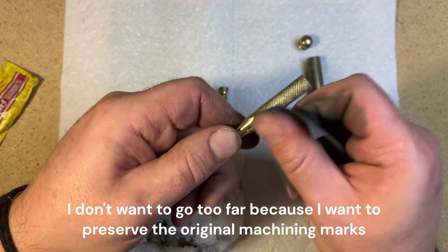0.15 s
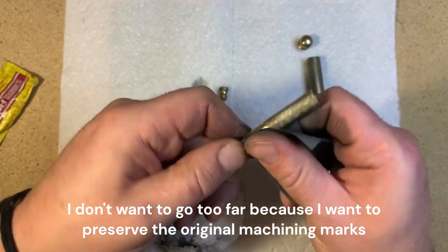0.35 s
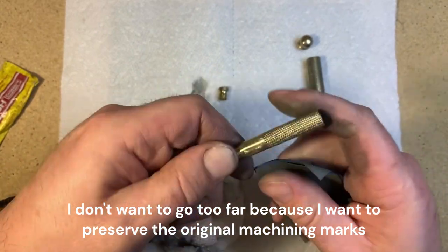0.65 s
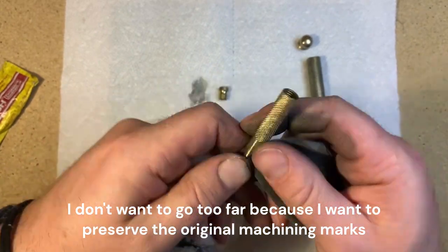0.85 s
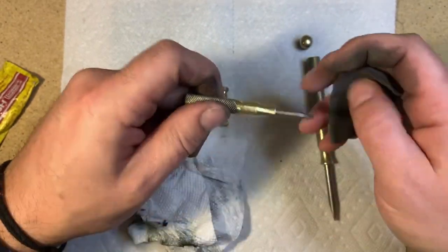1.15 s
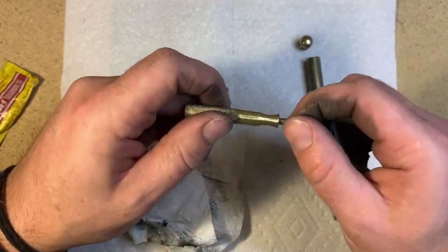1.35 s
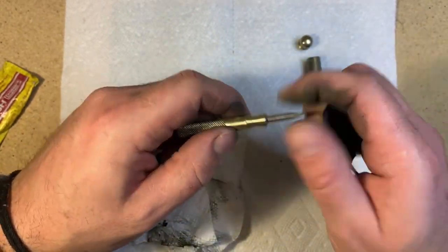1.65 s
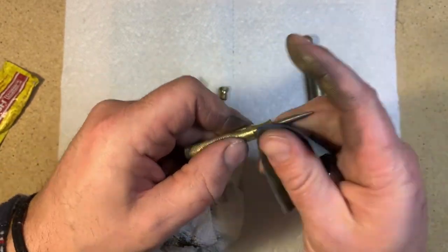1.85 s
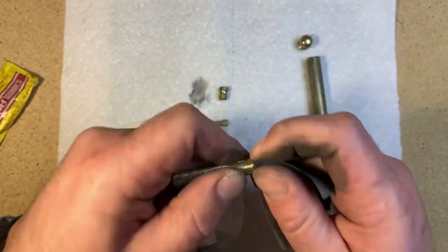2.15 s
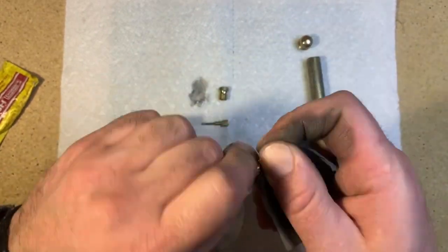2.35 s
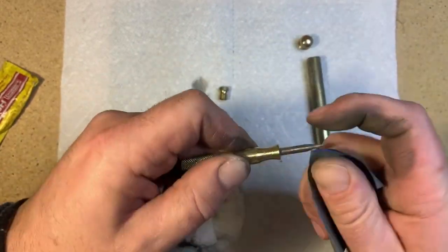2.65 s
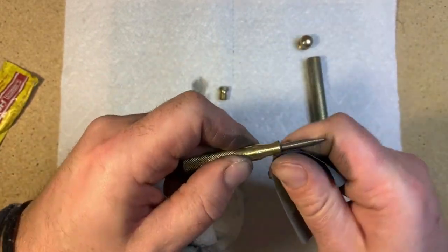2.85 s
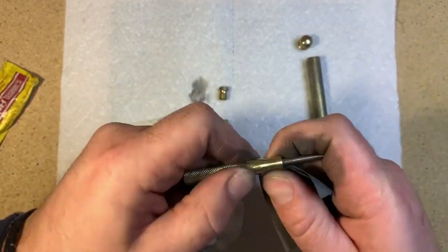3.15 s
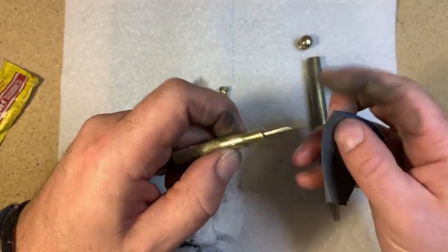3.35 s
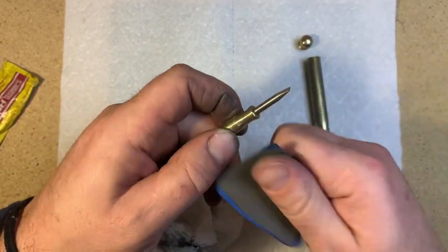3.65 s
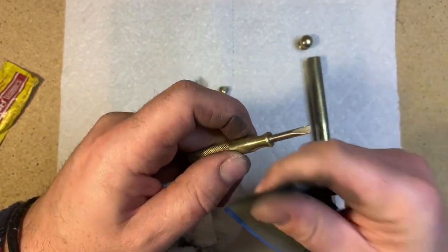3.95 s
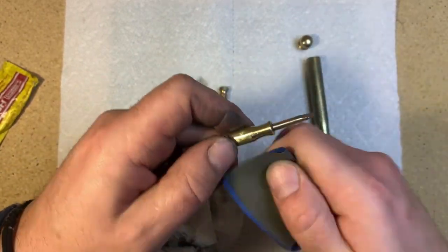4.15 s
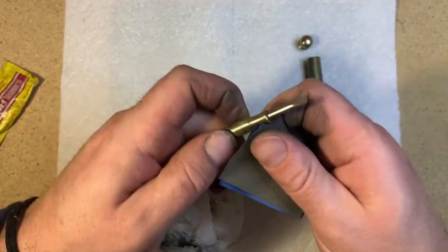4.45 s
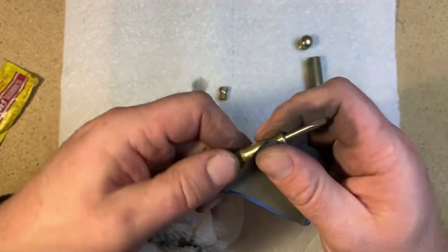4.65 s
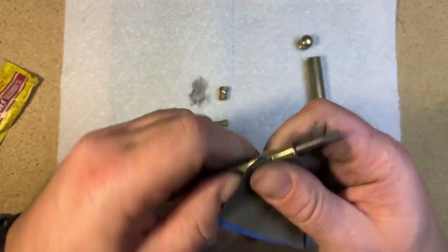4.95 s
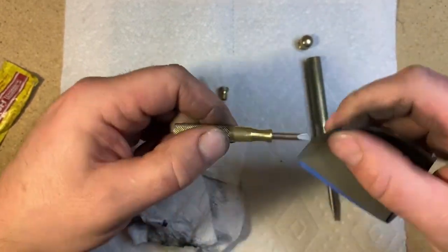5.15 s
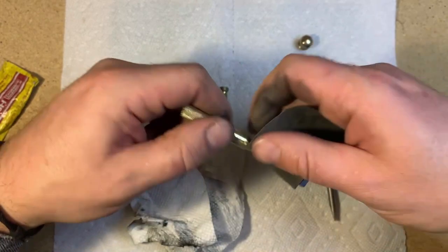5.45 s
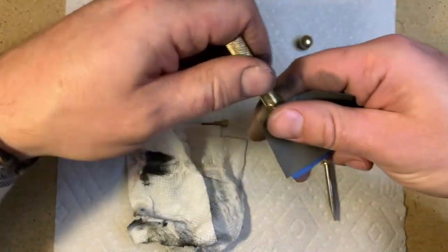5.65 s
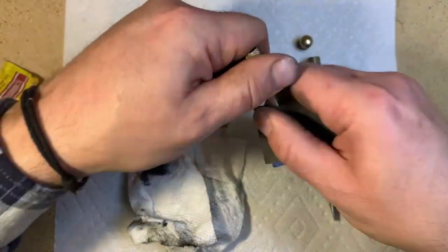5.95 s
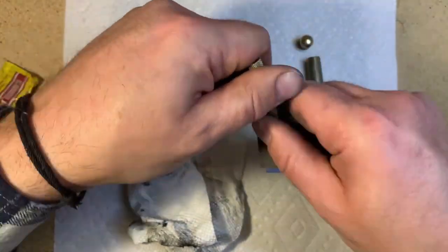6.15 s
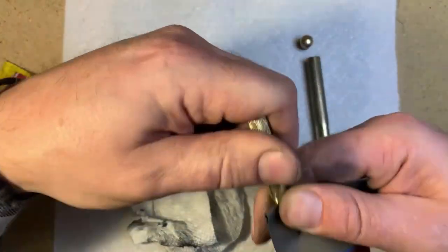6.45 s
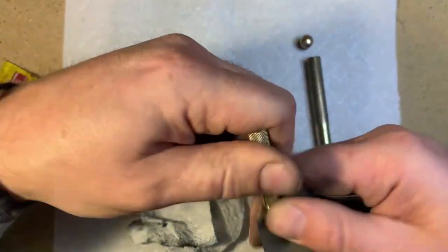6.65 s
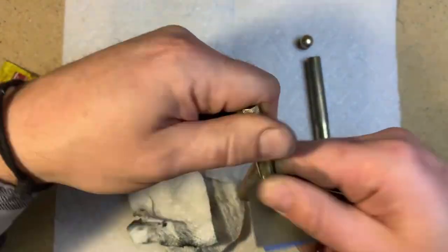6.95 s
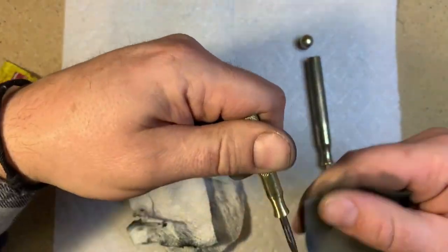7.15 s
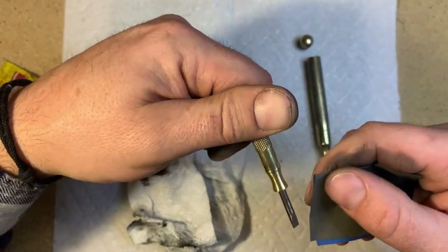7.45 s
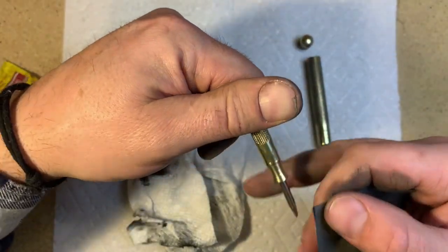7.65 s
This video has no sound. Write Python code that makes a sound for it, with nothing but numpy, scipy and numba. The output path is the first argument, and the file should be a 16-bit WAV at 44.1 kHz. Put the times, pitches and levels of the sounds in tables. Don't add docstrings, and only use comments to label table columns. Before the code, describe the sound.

Close, bright rasping of fine grit on metal in short uneven bouts, pausing once, while hands lightly knock and nudge the bench.

```python
import sys
import numpy as np
from scipy import signal
from scipy.fft import rfft, irfft, next_fast_len
from scipy.io import wavfile
from scipy.ndimage import uniform_filter1d, map_coordinates
from numba import njit

SR = 44100
rng = np.random.default_rng(int(sys.argv[2]) if len(sys.argv) > 2 else 0)


def boost_factor(decibels):
    exponent = np.asarray(decibels, float) / 20
    return 10 ** exponent


def int16_out(signal):
    q = np.round(np.clip(np.atleast_2d(signal).T, -1, 1) * 32767)
    wavfile.write(sys.argv[1], SR, q.astype(np.int16))


N = 343097

# frequency in Hz, level in dB per Hz.
ROOM_COLOUR = [(20, -13), (35, 0), (120, -5), (250, -12.5), (400, -18), (1500, -25), (2500, -33.5),
               (5000, -38), (8000, -42.5), (12300, -38.5), (13000, -34.5), (15600, -35), (16200, -84.5)]
ROOM_DB = -72

# peak in seconds, rise in seconds, level in dB.
BENCH_NUDGES = [
    (.08, .15, -55),
    (.33, 0.14, -43),
    (.75, 0.11, -51.5),
]
# peak in seconds, rise in seconds, fall in seconds, hum in dB, rumble in dB.
ARM_LEANS = [
    (0.0, .1, 1.13, -57.5, -60),
    (1.99, 0.042, 0.14, -62, -59),
    (2.92, 0.27, 0.097, -65, -62.5),
    (4.7, 0.64, 0.72, -66.5, -75.5),
]
HUM_DB, RUMBLE_DB = -66, -73.5
RING_T60_S = 1.04

# start in seconds, peak in dB, ring in Hz, thud in dB.
KNUCKLE_KNOCKS = [(0.145, -38.5, 755, -45.5), (0.632, -56, 803, -63), (2.002, -39.5, 762, -44),
                  (2.327, -60.5, 676, -63.5), (2.468, -63.5, 720, -63), (3.286, -64, 584, -66.5),
                  (3.643, -54.5, 608, -66), (4.37, -55, 633, -59), (4.925, -61, 765, -56),
                  (5.007, -43, 753, -49.5), (6.615, -55.5, 690, -57.5), (6.979, -68, 750, -59.5),
                  (7.159, -59, 487, -69)]

# peak in
# seconds, swell in ms, fade in ms, level in dB.
RUB_STROKES = [(0.006, 21, 43, -52.5), (0.058, 9.7, 15, -40.5), (0.098, 14, 15, -43), (0.129, 19, 13, -44),
               (0.176, 34, 26, -41.5), (0.239, 19, 86, -43.5), (0.384, 40, 39, -39), (0.456, 18.4, 28, -37),
               (0.565, 70, 16.7, -33), (0.613, 29, 42, -33), (0.68, 17, 31, -61.5), (0.761, 7, 24, -47),
               (0.846, 2, 22, -47.5), (0.891, 37, 27, -64.5), (0.948, 15, 54, -54.5),
               (0.995, 14, 20.4, -34.5), (1.072, 8, 12, -45.5), (1.102, 44, 24, -44), (1.125, 9, 13, -24.5),
               (1.168, 34, 26, -37.5), (1.24, 41, 10.2, -39),
               (1.68, 31, 38, -47.5), (1.765, 44, 45, -41.5), (1.844, 13, 5, -26), (1.881, 5.2, 30, -56),
               (1.989, 56.5, 15, -40.5), (2.048, 53, 23, -41.5), (2.1, 18.4, 37, -42), (2.169, 36, 18, -41),
               (2.21, 13, 42, -42.5), (2.289, 74, 32, -43), (2.33, 6.6, 19, -39), (2.356, 24, 17, -33.5),
               (2.432, 51, 38, -42), (2.47, 2, 44, -43.5), (2.496, 28, 13, -36), (2.556, 38, 55, -46),
               (2.655, 46, 20, -55.5), (2.725, 40, 26, -54.5), (2.77, 14, 23, -49.5),
               (2.856, 14, 39, -45.5), (2.896, 113, 180, -55.5), (2.96, 9.3, 18, -41),
               (3.0, 18, 300, -57.5), (3.087, 37, 25, -42), (3.174, 49, 20, -38), (3.216, 39, 11, -43.5),
               (3.282, 15, 13.6, -39.5), (3.331, 20, 55, -44), (3.398, 4, 17, -57),
               (3.449, 14, 18, -34), (3.485, 44, 27, -39.5), (3.556, 42, 74, -41.5), (3.64, 29, 40, -31),
              (3.7, 29, 39, -33.5), (3.765, 15, 54, -35.5), (3.896, 5, 69, -39.5), (4.0, 53, 38, -45.5),
              (4.083, 39, 31, -43.5), (4.124, 19, 26, -38), (4.177, 31, 45, -42.5), (4.268, 48, 32, -44),
              (4.301, 11, 42, -38), (4.372, 6.6, 30, -28), (4.449, 34, 42, -41.5), (4.518, 18, 9, -35.5),
              (4.565, 36, 13, -46.5), (4.6, 28, 22, -45), (4.66, 24, 13, -57.5), (4.684, 2, 78, -36.5),
              (4.71, 28, 56, -34.5), (4.801, 43, 72, -44.5), (4.888, 32, 20, -38), (4.933, 35, 17, -29),
              (4.998, 67, 24, -38.5), (5.011, 14, 4, -36.5), (5.106, 73, 124, -43.5),
              (5.193, 69, 10, -41.5), (5.225, 59, 9.5, -41),
               (5.277, 27, 19, -46), (5.318, 30, 26, -38), (5.369, 30, 44, -48), (5.475, 35, 7.9, -44),
               (5.535, 66, 35, -52), (5.607, 29, 31, -43.5), (5.653, 15, 20, -54), (5.704, 21, 24, -47.5),
               (5.729, 14, 112, -52), (5.796, 37, 8.7, -32.5), (5.886, 48, 14, -54.5),
               (5.947, 29.7, 29.7, -35.5), (6.019, 19, 78, -46), (6.051, 14, 36.6, -35),
               (6.158, 41, 31, -39), (6.252, 31, 24, -41), (6.278, 62, 13, -44), (6.364, 47.6, 22, -38),
               (6.46, 48, 23.4, -40.5), (6.543, 48, 31, -41), (6.621, 32, 43, -38.5),
               (6.695, 24, 20, -39.5), (6.731, 37, 26, -42), (6.812, 31, 32, -38.5), (6.88, 52, 95, -45),
               (6.963, 15, 72, -41.5), (7.071, 23, 26, -55), (7.144, 29, 41, -43), (7.251, 12.4, 23, -64.5),
               (7.694, 8.3, 18, -48.5)]
# peak in seconds, level in dB, grit
# over paper in dB.
SNAP_TICKS = [(0.605, -34, 12), (0.634, -30, 11), (0.649, -36, 0), (0.763, -36, -4), (1.124, -27, 3),
              (1.172, -34, 7), (1.74, -39, 1), (1.848, -31, 4), (2.255, -38, -1), (2.332, -40, -12),
              (2.389, -35, -8), (2.469, -42, 7), (2.74, -51, -10), (3.0, -47, -13), (3.173, -38, 4),
              (3.214, -35, -2), (3.289, -39, 5), (3.644, -29, 13), (3.657, -41, -1), (3.673, -41, 6),
              (4.309, -39, 19), (4.374, -24, 14), (4.382, -29, 10), (4.399, -22, 10), (4.451, -41, 3),
              (4.504, -42, 7), (4.683, -41, 7), (4.892, -40, -5), (5.096, -40, -1), (5.197, -40, -6),
              (5.792, -29, -3), (5.803, -41, -3), (6.019, -40, -18), (6.443, -39, -12), (6.65, -41, -6),
             (6.79, -36, 0), (6.869, -40, -16), (6.891, -38, -14), (7.161, -36, 12), (7.697, -41, -2),
             (7.706, -54, -8)]
# time in seconds, grit over paper in dB at the usual pressure.
WRAP_TIGHTNESS = [(0, 19), (.45, 11), (.85, 12), (1.08, 5), (1.7, 9.5), (2.0, 12), (2.45, 10.5), (2.75, 8),
                  (3.15, 6.5), (3.5, 10.5), (3.85, 25.5), (4.08, 10), (5.15, 9), (5.35, 4), (5.7, 8.5),
                  (6.05, -2), (6.75, 0.5), (7.1, 11)]
# frequency in Hz, width in Hz, level in dB.
PAPER_MODES = [(2950, 500, -6), (3500, 450, -4), (4050, 600, 0), (5150, 800, -4), (6300, 600, -4),
               (7100, 700, -5)]
GRIT_MODES = [(8300, 1800, -1), (10000, 2200, -1), (11900, 2400, -1), (13800, 2500, -1), (15400, 3500, 6)]
HAND_MODES = [(380, 830, -7), (779, 1120, -1.5), (1350, 130, -28.5), (1984, 630, 6.5)]
USUAL_DB, GRIT_PER_DB = -43, 0.31
HAND_DB, HAND_PER_DB, HAND_PER_GRIT = -17, -0.39, -0.46
TOP_HZ, SNAP_DB = 15750, 8.5

# frequency in Hz, lead of the right channel in radians, left minus right in dB.
CHANNEL_DIFFERENCES = [(40, .1, 0), (130, .2, .3), (240, 1.05, 1), (390, 1.2, 0), (750, 1.1, -3),
                       (1100, .7, -1), (1500, 0, -1), (2000, -.7, -1.8), (2400, -1.5, -2.3), (2900, -1, -1),
                       (3660, -1.6, -.4), (4660, -3.14, 0)]
TURN_HZ = 4260
SHELF_HZ, SHELF_WIDTH_HZ, SHELF_DB = 12500, 350, -7
SWAY_SAMPLES, SWAY_PER_S = .35, 5


@njit
def svf(x, hz, width):
    y, b, l = np.empty(len(x)), 0., 0.
    for i in range(len(x)):
        g, k = np.tan(np.pi * hz[i] / SR), width / hz[i]
        v = (b + g * (x[i] - l)) / (1 + g * (g + k))
        b, l, y[i] = 2 * v - b, l + 2 * g * v, k * v
    return y


def unit(x):
    return x / np.sqrt(np.mean(x ** 2))


def walk(rate):
    k = int(SR / rate)
    steps = np.repeat(rng.standard_normal(N // k + 1), k)
    return 0.92 * uniform_filter1d(uniform_filter1d(steps, k), k)[:N]


def noise():
    return rng.standard_normal(N)


def bell(t, peak, rise, fall):
    span = np.where(t < peak, max(rise, .001), max(fall, .001))
    return boost_factor(-20 * ((t - peak) / span) ** 2)


def ring(drive, modes, drift, rate, patchy_db):
    out = 0
    for hz, width, db in modes:
        centre = np.clip(hz * (1 + drift * walk(rate)), 50, .4 * SR)
        strength = boost_factor(db + patchy_db * walk(rate))
        once = svf(drive(), centre, 1.37 * width)
        out = out + strength * svf(once, centre, 1.37 * width)
    return out


def room():
    hz, db = np.transpose(ROOM_COLOUR)
    f = np.fft.rfftfreq(N, 1 / SR)
    colour = boost_factor(np.interp(np.log(f + 1), np.log(hz), db))
    level = boost_factor(ROOM_DB + 0.27 * walk(4.6))
    return level * unit(irfft(rfft(noise()) * colour, N))


def bench():
    t = np.arange(N) / SR
    hum_gain, rumble_gain, ring_gain = boost_factor(HUM_DB), boost_factor(RUMBLE_DB), 0
    for s, rise, fall, hum_db, rumble_db in ARM_LEANS:
        lean = np.sqrt(bell(t, s, rise, fall))
        hum_gain = hum_gain + boost_factor(hum_db) * lean
        rumble_gain = rumble_gain + boost_factor(rumble_db) * lean
    for s, rise, db in BENCH_NUDGES:
        decay_db = 60 * np.maximum(t - s, 0) / RING_T60_S
        ring_gain = ring_gain + boost_factor(db - decay_db) * bell(t, s, rise, 1e3)
    hum = ring(noise, [(67.1, 20.6, 0.1)], 0.11, 3, 0.58)
    rumble = ring(noise, [(137, 58, 1.5), (188.7, 26, -6.5), (237.3, 26, -6.0)], 0.021, 4.4, 3.5)
    main_hz = 87 * (1 + 0.026 * walk(14))
    main = np.sin(2 * np.pi * np.cumsum(main_hz) / SR) * boost_factor(1.3 * walk(28))
    return hum_gain * unit(hum) + rumble_gain * unit(rumble) + ring_gain * unit(main)


def knocks():
    out, t = np.zeros(N), np.arange(int(0.044 * SR)) / SR
    scuff = unit(ring(noise, [(1000, 900, 0)], 0, 1, 0))
    held = np.clip(t / .003, 0, 1) * np.exp(-(t / .0135) ** 4)
    late = np.exp(-((t - .010) / 0.0069) ** 2)
    for s, db, hz, thud_db in KNUCKLE_KNOCKS:
        phase = 2 * np.pi * rng.random(3)
        at = int((s - .002) * SR)
        tone = np.sin(2 * np.pi * hz * t + phase[0])
        tone += boost_factor(-13) * np.sin(2 * np.pi * 1.73 * hz * t + phase[1])
        tone += boost_factor(-8) * np.sin(2 * np.pi * .84 * hz * t + phase[2])
        tone += boost_factor(-11) * scuff[at:at + len(t)]
        thud = np.sin(2 * np.pi * 250 * t + phase[2])
        thud += boost_factor(-0.5) * np.sin(2 * np.pi * 335 * t + phase[1])
        out[at:at + len(t)] += boost_factor(db + 4.0) * held * tone + boost_factor(thud_db + 4.5) * late * thud
    return out


def catches(rate, spread_db):
    size = boost_factor(spread_db * rng.exponential(size=N)) * noise()
    return unit(size * (rng.random(N) < rate / SR))


def shares(db, grit_db, hand_db):
    grit = 1 / (1 + boost_factor(-2 * grit_db))
    return boost_factor(db) * np.array([np.sqrt(grit), np.sqrt(1 - grit), boost_factor(hand_db)])


def stroke_power():
    power = np.zeros((3, N))
    near = np.arange(-SR // 4, SR // 4)
    for s, swell, fade, db in RUB_STROKES:
        at = near + int(s * SR)
        at = at[(at >= 0) & (at < N)]
        shape = bell(at / SR, s, swell / 1000, fade / 1000)
        wrap_db = np.interp(s, *np.transpose(WRAP_TIGHTNESS))
        harder_db = db - USUAL_DB
        hand_db = HAND_DB + HAND_PER_DB * harder_db + HAND_PER_GRIT * wrap_db
        parts = shares(db, wrap_db + GRIT_PER_DB * harder_db, hand_db)
        power[:, at] += (parts[:, None] * shape) ** 2
    return power


def snap_shapes():
    snaps, n = np.zeros((3, N)), np.arange(300)
    crumble = np.exp(-n / (.0005 * SR)) + boost_factor(-24) * np.exp(-n / (.003 * SR))
    for s, db, grit_db in SNAP_TICKS:
        at = int((s - .0005) * SR)
        peak_db = db + .35 * max(grit_db, 0)
        snaps[:, at:at + 300] += shares(peak_db, grit_db, -18.0 - 0.15 * grit_db)[:, None] * crumble
    return snaps


def sanding():
    power, snaps = stroke_power(), snap_shapes()
    bite = boost_factor(1.3 * walk(150) + 1.8 * walk(60))
    rub, tick = 0, 0
    # modes, catches a second, spread in dB, drift of the centres, patchiness in dB.
    layers = [(GRIT_MODES, 12000, 1.6, .03, 2.5),
              (PAPER_MODES, 6000, 2, .05, 4),
              (HAND_MODES, 5000, 2, .07, 3.5)]
    for k, (modes, rate, spread_db, drift, patchy_db) in enumerate(layers):
        passed = sum(boost_factor(2 * db) * width for _, width, db in modes) * 2.325 / SR
        gain = boost_factor(-10 * np.log10(passed))
        press = bite * np.sqrt(power[k])

        def rubbing():
            return catches(rate, spread_db) * press

        def snapping():
            return np.sign(noise()) * boost_factor(SNAP_DB) * snaps[k]

        rub = rub + gain * ring(rubbing, modes, drift, 22, patchy_db)
        tick = tick + gain * ring(snapping, modes, drift, 22, 1.3)
    rub_top = signal.ellip(8, .2, 50, TOP_HZ, fs=SR, output="sos")
    tick_top = signal.ellip(6, .2, 50, 16500, fs=SR, output="sos")
    return signal.sosfilt(rub_top, rub) + signal.sosfilt(tick_top, tick)


def scene():
    high_pass = signal.butter(2, 500, "high", fs=SR, output="sos")
    apart = signal.sosfilt(high_pass, [room(), room()])
    return sanding() + knocks() + bench() + room() + boost_factor(3.0) * apart


def top_cut(x):
    return signal.sosfilt(signal.butter(12, 16990, fs=SR, output="sos"), x)


def record(dry):
    size = next_fast_len(N + 8192)
    f = np.fft.rfftfreq(size, 1 / SR)
    hz, lead, tilt_db = np.transpose(CHANNEL_DIFFERENCES)
    turn = np.interp(f, hz, lead) - 2 * np.pi * np.maximum(f - hz[-1], 0) / TURN_HZ
    side = np.array([[1], [-1]]) / 2
    echo = rng.standard_normal((2, 6000)) * np.exp(-np.arange(6000) / (.006 * SR))
    echo = rfft(echo / np.sqrt(np.sum(echo ** 2, axis=1, keepdims=True)), size)
    share = .25 * np.exp(-(np.log((f + 1) / 1500) / .7) ** 2) + .12
    ports = boost_factor(side * np.interp(f, hz, tilt_db)) * np.exp(-1j * side * turn) * (1 + share * echo)
    shelf = boost_factor(SHELF_DB * np.clip((f - SHELF_HZ) / SHELF_WIDTH_HZ, 0, 1))
    x = irfft(rfft(dry, size) * ports * shelf, size)[:, :N]
    heard_at = np.arange(N) + SWAY_SAMPLES * walk(SWAY_PER_S)
    x[1] = map_coordinates(x[1], [heard_at], order=5, mode="mirror")
    return top_cut(x)


dry = scene()
out = record(dry)
int16_out(out)
```